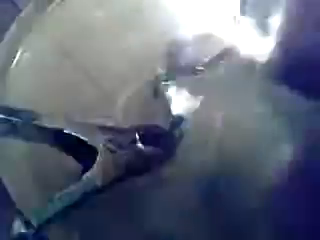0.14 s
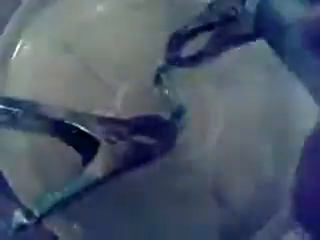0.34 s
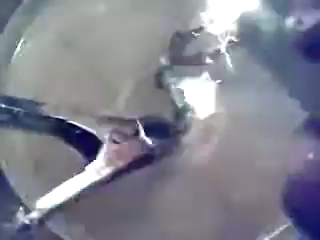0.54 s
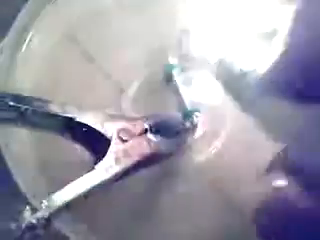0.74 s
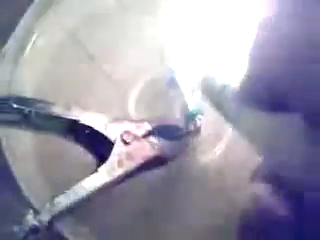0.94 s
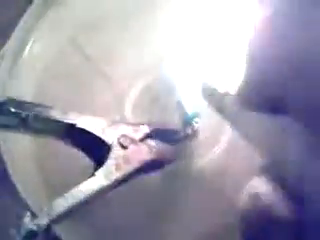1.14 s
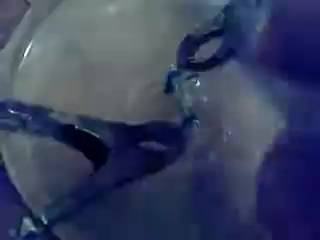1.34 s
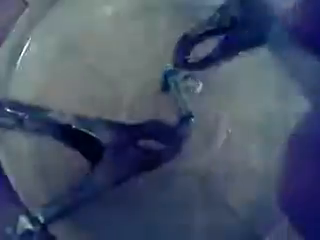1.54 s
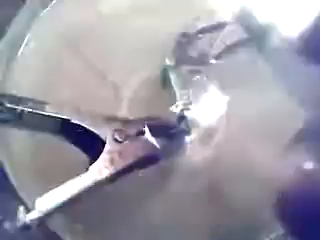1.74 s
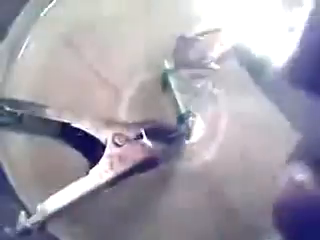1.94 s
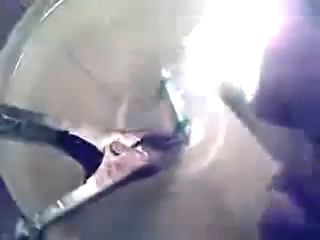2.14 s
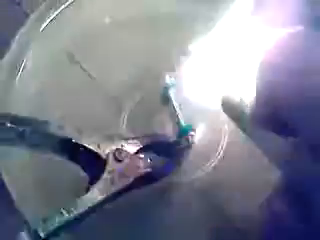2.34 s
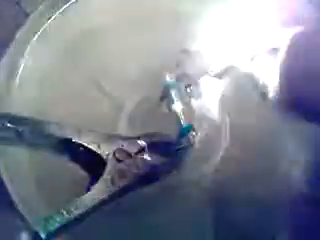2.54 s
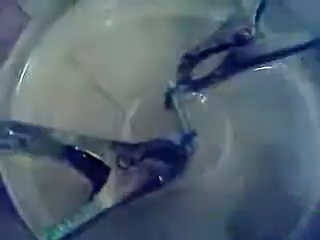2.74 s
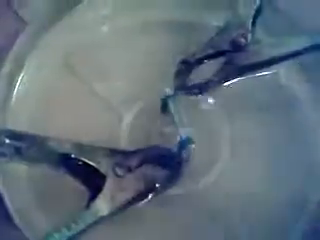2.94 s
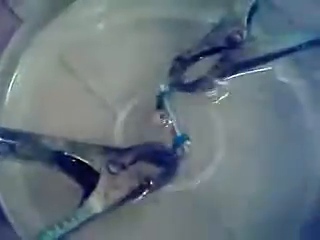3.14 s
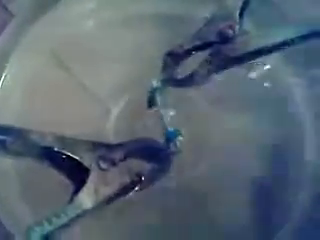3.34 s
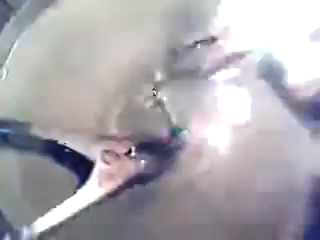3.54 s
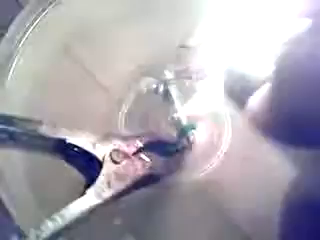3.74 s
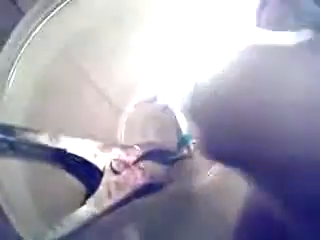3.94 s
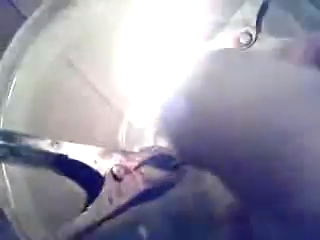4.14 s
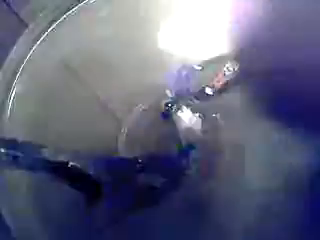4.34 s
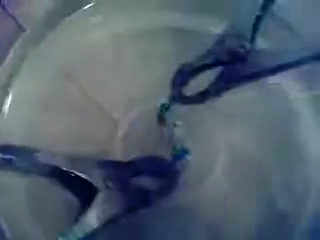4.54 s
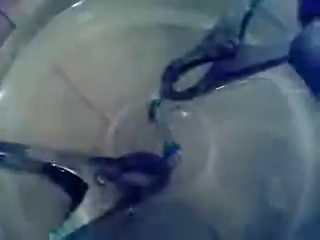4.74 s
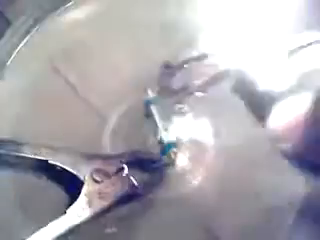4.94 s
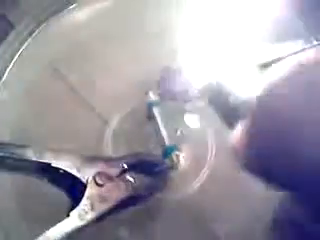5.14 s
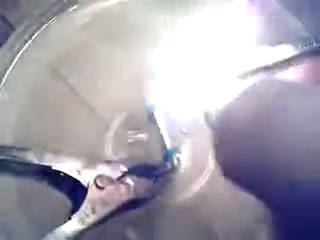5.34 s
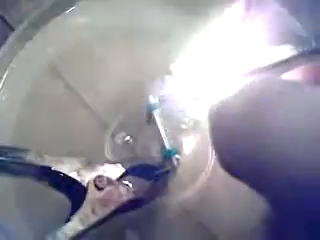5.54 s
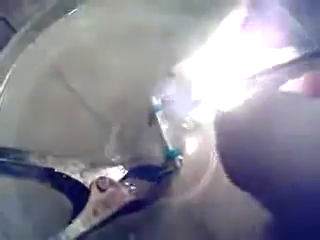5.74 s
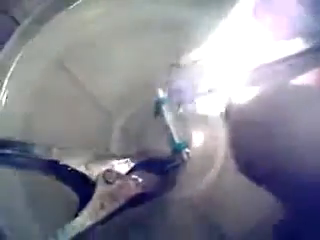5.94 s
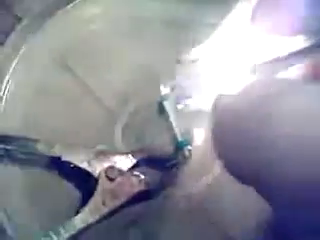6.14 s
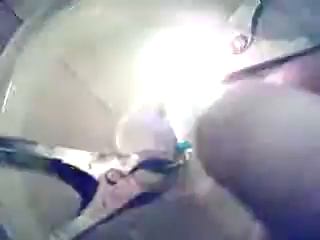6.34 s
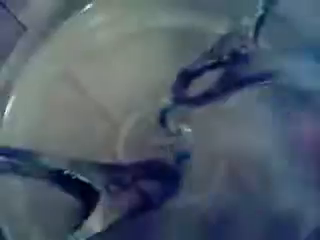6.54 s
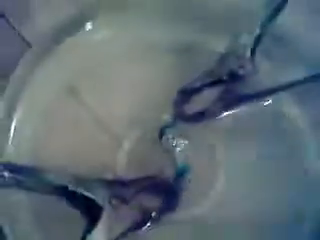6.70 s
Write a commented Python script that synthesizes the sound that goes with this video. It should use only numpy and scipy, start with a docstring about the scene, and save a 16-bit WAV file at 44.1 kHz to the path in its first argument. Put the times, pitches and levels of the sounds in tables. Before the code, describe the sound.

Sharp, overloaded bangs of small gas bubbles in a hard little room, set off by rasping lighter strikes over faint fizz, hum and a ticking clock.

```python
"""In a small room, a flint lighter is struck over a bowl of water in which electrolysis makes hydrogen and oxygen.
The wheel rasps and snaps, and the flame hisses until a bubble goes off with a bang that blows it out.
Each bang is a slowing pressure swing with a noisy crack, echoes and a ringing room; it overloads the microphone.
Between the bangs: bubble ticks and fizz as short pings, a clock ringing its plastic case, a motor hum of
steady tones, filtered hiss and the buzz of the camera as a train of low blips."""
import sys
import numpy as np
from scipy import signal
from scipy.fft import rfft, irfft, next_fast_len
from scipy.io import wavfile
from scipy.ndimage import uniform_filter1d

SR = 44100
rng = np.random.default_rng(int(sys.argv[2]) if len(sys.argv) > 2 else 0)


def dump(signal):
    """Clip the signal to [-1, 1] and save it as 16-bit WAV at the path in sys.argv[1]."""
    limited = np.clip(np.atleast_2d(signal).T, -1, 1)
    pcm = np.round(limited * 32767).astype(np.int16)
    wavfile.write(sys.argv[1], SR, pcm)


N = 298557
TIME = np.arange(N) / SR  # seconds
AFTER = TIME[:SR // 2]  # seconds since a blow

# Exploding bubbles. Each row: start in seconds, blast in dB, first swing rate in Hz, crack in dB,
# room in dB before a common gain, brightness in dB per octave.
BUBBLES = [(0.0147, 18.5, 191, 2.5, -17.5, 1.5), (1.2706, 11, 226, 4, -16.5, 1),
           (2.5772, 9, 196, 8.5, -18, -1.4), (4.3610, 12.5, 232.4, 6, -20, -2.5),
           (4.3950, 13, 586, 9.5, -44, -2.5), (6.4430, 11, 168.8, 5.5, -12.5, 0.5)]
# Strokes of the flint wheel. Each row: start in seconds, length in seconds, rasp at the start in dB,
# rasp at the end in dB, last snap in dB, snap pitch in Hz, puff of the catching gas in dB.
WHEEL_STROKES = [(0.7096, 0.0303, -29.5, -14, -3.5, 2300, -22.5),
                 (1.835, 0.028, -32, -17, -11, 2270, -18.5), (3.6438, .0215, -23, -17, -3, 1800, -11.5),
                 (5.0126, 0.014, -16.5, -20, -9, 2700, -15.5)]
SPARKS = [s + length for s, length, *_ in WHEEL_STROKES]  # each stroke ends in sparks (s)


def amp(db):
    """Decibels to gain."""
    return 10 ** (np.asarray(db) / 20)


def unit(x):
    """Scales to rms 1."""
    return x / np.sqrt(np.mean(x ** 2) + 1e-20)


def read(points, hz):
    """Reads a table on a log-frequency axis."""
    f, value = np.transpose(points)
    return np.interp(np.log(hz + 1), np.log(f + 1), value)


def add(mix, s, sound):
    """Mixes a sound in at s seconds, cut off at the end of the scene."""
    part = mix[max(round(s * SR), 0):][:len(sound)]
    part += sound[:len(part)]


def coloured(x, colour):
    """Filters by a table of Hz and dB."""
    size = next_fast_len(len(x) + 2048)
    gain = amp(read(colour, np.fft.rfftfreq(size, 1 / SR)))
    return irfft(rfft(x, size) * gain, size)[:len(x)]


def noise(colour, size):
    """Coloured noise of rms 1."""
    return unit(coloured(rng.standard_normal(size), colour))


def dying(t60, t=AFTER):
    """Falls by 60 dB in t60 seconds."""
    return np.exp(-np.log(1000) * t / t60)


def ring(hz, t60):
    """One struck mode: a sine that dies away."""
    return np.sin(2 * np.pi * hz * AFTER) * dying(t60)


def rattle(hz, width_hz, t60):
    """A crowd of close modes struck at once: a broad resonance, as strong as one mode with this decay."""
    f = np.fft.rfftfreq(len(AFTER), 1 / SR) + 1  # kept off zero
    resonance = 1 / (1 + 1j * (f - hz * hz / f) / width_hz)
    crowd = irfft(rfft(rng.standard_normal(len(AFTER))) * resonance ** 2, len(AFTER))
    one_mode_rms = np.sqrt(np.mean(dying(t60) ** 2) / 2)
    return unit(crowd * dying(t60)) * one_mode_rms


def bangs(push_cycles=0.985, slowing_s=0.0075, swing_cycles=2.28, crack_cycles=3.16, crack_spread=0.87,
          echo_hz=1550, echo_width_hz=900, echo_t60=0.011, echo_db=3, room_db=2):
    """Each bubble gives a push, a suction and a rebound, a crack from the bowl, near echoes and the room's tail."""
    # Hard surfaces near the bowl. Each row: delay in seconds, level in dB above the room before echo_db is added.
    echoes = [(.0036, 10.5), (.0082, 5)]
    out = np.zeros(N)
    for s, blast_db, swing_hz, crack_db, tail_db, tilt_db in BUBBLES:
        # a big, slow bubble lasts longer
        swing_t60, crack_t60 = swing_cycles / swing_hz, crack_cycles / swing_hz
        crack_hz = 2110 * 2 ** (0.28 * tilt_db)  # a brighter bang cracks higher
        push_s = push_cycles / crack_hz  # a slow push goes with a dull crack
        # each swing outlasts the one before
        turns = swing_hz * slowing_s * np.log((AFTER + slowing_s) / (push_s + slowing_s))
        front = np.minimum(AFTER / push_s, 1)
        blast = -amp(blast_db) * np.sin(2 * np.pi * turns) * dying(swing_t60)
        crack = amp(crack_db) * rattle(crack_hz, crack_spread * crack_hz, crack_t60)
        add(out, s, front * (blast + crack))
        for delay, db in echoes:
            add(out, s + delay, amp(tail_db + db + echo_db) * rattle(echo_hz, echo_width_hz, echo_t60))
        add(out, s, amp(tail_db + room_db) * room_tail(tilt_db))
    return out


def room_tail(tilt_db, modes_db=-12, build_s=0.0043):
    """A diffuse tail, each band dying at its own speed, with modes standing out; sharper blows tilt it brighter."""
    # Colour of the diffuse tail. Each row: frequency in Hz, relative level in dB.
    room_colour = [(60, -16.5), (160, -9), (280, -3), (450, -4.5), (800, -5), (1400, 0), (2000, -3),
                   (2800, -7), (4000, -10), (7000, -10.5)]
    # How long the room holds each band. Each row: frequency in Hz, 60 dB decay in seconds.
    room_decay = [(100, 0.29), (350, 0.35), (1000, .32), (2200, 0.33), (4500, 0.25)]
    # Resonances of room and bowl. Each row: frequency in Hz, relative level in dB, 60 dB decay in seconds.
    room_modes = [(260.4, 2, 0.29), (298.6, -2, 0.25), (356.6, -10.5, 0.53), (612.6, 4.5, 0.072),
                  (667, -8, 0.35), (867, 1, 0.093), (1042, -4.5, 0.29), (1200, 11, 0.074), (1425, -5, 0.16),
                  (1466, 1, 0.29), (1729, 1, 0.28), (1800, 9.5, 0.094), (1934, -5, .26), (1900, -6.5, 0.45),
                  (2100, -24, 0.2), (2290, -8, 0.28), (2344, -1, 0.26), (2780, -16, 0.16)]

    def tilt(f):
        return amp(tilt_db * np.log2(np.clip(f, 200, 6000) / 1500))

    hz, t, z = signal.stft(noise(room_colour, len(AFTER)), SR, nperseg=256)
    z = z * tilt(hz)[:, None] * dying(read(room_decay, hz)[:, None], t)
    diffuse = signal.istft(z, SR, nperseg=256)[1][:len(AFTER)]
    modes = sum(amp(db) * tilt(f) * rng.choice([-1, 1]) * ring(f, t60) for f, db, t60 in room_modes)
    build_up = 1 - np.exp(-AFTER / build_s)
    return (diffuse + amp(modes_db) * modes) * build_up


def lighter(teeth_per_s=420, bite=0.89, stop_t60=0.031, snap_width_hz=1400, snap_t60=0.021,
            puff_hz=380, puff_width_hz=600, puff_t60=0.029, room_db=-21):
    """The wheel's teeth scrape the flint until it snaps free in sparks, and the gas catches with a puff."""
    # Colour of the scraped flint. Each row: frequency in Hz, relative level in dB.
    rasp_colour = [(60, -2), (200, -10.5), (500, 3.5), (1000, -2), (1700, 3.5), (2400, 9.5), (3200, -1.5),
                   (4200, -8.5), (7000, -2.5)]
    out = np.zeros(N)
    for s, length, start_db, end_db, snap_db, hz, puff_db in WHEEL_STROKES:
        press = amp(np.interp(AFTER, [0, length], [start_db, end_db]))
        press = press * dying(stop_t60, np.maximum(AFTER - length, 0))
        wobble = unit(uniform_filter1d(rng.standard_normal(len(AFTER)), size=100))
        speed = teeth_per_s * (1 + 0.26 * wobble)
        tooth_phase = np.cumsum(speed) / SR % 1
        teeth = unit(np.exp(-tooth_phase / bite))  # each tooth bites, then eases
        add(out, s, press * teeth * noise(rasp_colour, len(AFTER)))
        add(out, s + length, amp(snap_db) * rattle(hz, snap_width_hz, snap_t60))
        add(out, s + length, amp(puff_db) * rattle(puff_hz, puff_width_hz, puff_t60))
        add(out, s + length, amp(end_db + room_db) * room_tail(tilt_db=0.5))
    return out


def creep(lead_per_length=1.8, quick_s=0.017, count=3, level_db=-28, spread_db=2,
          hz=2200, width_hz=1400, t60=0.0086):
    """As the thumb bears down before a slow stroke, the wheel slips by single teeth; a quick one starts at once."""
    out = np.zeros(N)
    for s, length, *_ in WHEEL_STROKES:
        lead_s = lead_per_length * max(length - quick_s, 0)
        for k, (place, size) in enumerate(rng.uniform(-0.86, 1, (count, 2))):
            slip_s = s - lead_s * (k + 1 + place / 2) / count
            add(out, slip_s, amp(level_db + spread_db * size) * rattle(hz, width_hz, t60))
    return out


def flame(level_db=-47):
    """Gas hisses from the lighter while it burns: noise that follows the strength of the flame."""
    # Colour of the burning gas. Each row: frequency in Hz, relative level in dB.
    flame_colour = [(30, 9.5), (120, 9.5), (300, 2), (700, -1), (1300, -1), (2300, 1.5), (3200, -17.5),
                    (4200, -18), (7000, -10)]
    return amp(level_db) * burning() * noise(flame_colour, N)


def burning(catch_s=0.11):
    """Strength of the flame, 0-1: it grows from each spark and lasts until the next bang blows it out."""
    strength = np.zeros(N)
    for spark in SPARKS:
        blown_out = min(s for s, *_ in BUBBLES if s > spark)
        strength += np.clip((TIME - spark) / catch_s, 0, 1) * (TIME < blown_out)
    return strength


def spatter(count=16, heating_s=1.6, level_db=-35, spread_db=2, low_hz=2100, high_hz=3400,
            width_hz=700, t60=0.017):
    """Faint ticks come at random, the more often the longer the flame has burnt."""
    out, heat = np.zeros(N), np.cumsum(burning(heating_s) ** 2)
    for k, (when, size, pitch) in enumerate(rng.random((count, 3))):
        # equal shares of the heat, one tick in each
        s = np.searchsorted(heat, heat[-1] * (k + when) / count) / SR
        hz = low_hz * (high_hz / low_hz) ** pitch
        add(out, s, amp(level_db + spread_db * (2 * size - 2)) * rattle(hz, width_hz, t60))
    return out


def ticks(level_db=1, width_hz=1200, t60=0.0076, lag_s=0.0005):
    """Short clicks of bursting bubbles and of the lighter in the hand, each a rattle at its own pitch."""
    # The clearest ticks. Each row: start in seconds before lag_s, level in dB before level_db, pitch in Hz.
    clear_ticks = [(0.6115, -17.5, 2230), (1.0762, -29, 2300), (1.816, -32, 2110), (2.409, -28.5, 2650),
                   (3.995, -27.5, 2330), (6.1028, -30, 3360), (6.2851, -31, 2700)]
    out = np.zeros(N)
    for s, db, hz in clear_ticks:
        add(out, s + lag_s, amp(db + level_db) * rattle(hz, width_hz, t60))
    return out


def fizz(level_db=-59, per_s=160, spread_db=7.5, low_hz=1100, high_hz=4200, cycles=16):
    """Tiny bubbles burst at the surface, each a short ping at one of 20 pitches; the higher, the shorter."""
    out = np.zeros(N)
    for hz in np.geomspace(low_hz, high_hz, 20):
        size = amp(spread_db * np.minimum(rng.exponential(1, N), 3.5))
        bursts = size * (rng.random(N) < per_s / 20 / SR)
        ping = ring(hz, cycles / hz)[:SR // 20]
        out += signal.oaconvolve(bursts, ping)[:N]
    return amp(level_db) * unit(out)


def clock(period_s=.9986, bounce_s=.004, bounce_db=-8, bounce_hz=2600, width_hz=500, bounce_t60=0.035):
    """Each step of the quartz clock's hand rings the plastic case, then bounces and rattles briefly."""
    # Tick and softer tock, repeated every period. Each row: first start in seconds, level in dB.
    clock_beats = [(0.218, -29.5), (0.630, -33)]
    # Modes of the case. Each row: frequency in Hz, relative level in dB, 60 dB decay in seconds.
    case_modes = [(2647, -5.5, 0.024), (2510, -7, 0.029), (2950, -12.5, 0.012), (1200, -12.5, 0.023)]
    out = np.zeros(N)
    case = sum(amp(db) * ring(hz, t60) for hz, db, t60 in case_modes)
    for first, db in clock_beats:
        for s in np.arange(first, N / SR, period_s):
            add(out, s, amp(db) * case)
            add(out, s + bounce_s, amp(db + bounce_db) * rattle(bounce_hz, width_hz, bounce_t60))
    return out


def background(hiss_db=-48.5, buzz_db=-45, blip_s=0.0024):
    """Hiss, hum, and a low blip that each picture frame leaks into the camera's microphone."""
    # Colour of the steady hiss. Each row: frequency in Hz, relative level in dB.
    hiss_colour = [(25, 0), (120, 9), (260, 6.5), (500, 3.5), (850, 1.5), (1200, 2.5), (1700, 0.5),
                   (2500, -0.5), (2950, 0), (3300, -1), (4200, -8.5), (7000, -8)]
    # Motor and mains hum, and two faint whines. Each row: frequency in Hz, rms level in dB.
    hum_tones = [(58.1, -61.5), (116.2, -68.5), (161.5, -63.5), (174.3, -70.5), (180, -67.5),
                 (290.5, -69.5), (348.6, -74), (442, -83.5), (2940, -69.5), (4000, -77)]
    frame_s, first_s = .04994, .0446
    since_frame = (TIME - first_s + frame_s / 2) % frame_s - frame_s / 2  # seconds, centred on the frame
    u = since_frame / blip_s
    blips = u * np.exp(-u * u / 2)
    hum = sum(amp(db) * np.sqrt(2) * np.sin(2 * np.pi * (hz * TIME + rng.random())) for hz, db in hum_tones)
    return amp(hiss_db) * noise(hiss_colour, N) + hum + amp(buzz_db) * blips


def stuck(lag_s=0.00384, longest_s=0.2):
    """The input's offset: it sets in just after a bang or a hard spark and holds until it snaps back."""
    # The input sticks off centre after an overload. Each row: snap back in seconds, offset in dB.
    snap_backs = [(0.1097, -22), (0.872, -27.5), (1.38, -22.5), (2.650, -22), (3.792, -21.5),
                  (4.427, -22.5), (6.59, -35.5)]
    blows = SPARKS + [s for s, *_ in BUBBLES]
    offset = np.zeros(N)
    for snap, db in snap_backs:
        cause = min(s for s in blows if s > snap - longest_s)
        offset += amp(db) * ((TIME > cause + lag_s) & (TIME < snap))
    return offset


def scene():
    """All sources at the one microphone."""
    struck = bangs() + lighter() + creep() + flame()
    small = ticks() + spatter() + fizz()
    return (struck + small + clock() + background())[None]


def record(dry, ceiling=0.76, edge_hz=15800):
    """The input saturates and sticks; a narrow band is kept, whose overshoots clip at full scale."""
    # Response of the narrow-band input. Each row: frequency in Hz, gain in dB.
    response = [(3900, 2), (4250, -1), (4650, -10), (5050, -20), (5450, -43), (5700, -31), (6000, -30.5),
                (6500, -27.5), (7000, -30.5), (7600, -66), (10000, -95)]
    driven = dry[0] - stuck()
    squashed = driven / (1 + (driven / ceiling) ** 6) ** (1 / 6)
    stored = np.clip(coloured(squashed, response), -1, 1)
    low_pass = signal.firwin(511, edge_hz, window=("kaiser", 9), fs=SR)
    return signal.oaconvolve(stored, low_pass, "same")[None]


dry = scene()
out = record(dry)
dump(out)
```